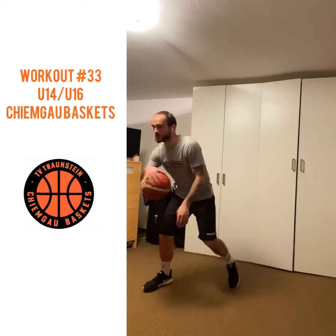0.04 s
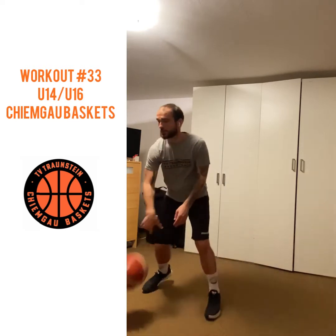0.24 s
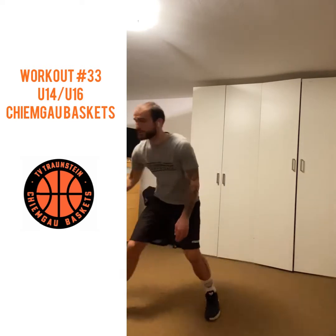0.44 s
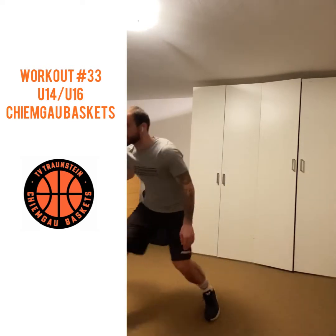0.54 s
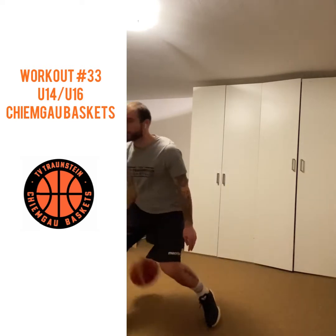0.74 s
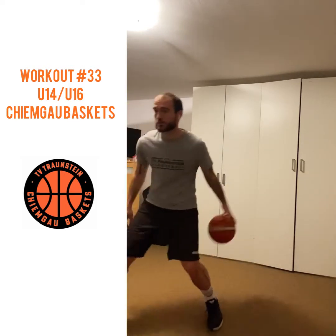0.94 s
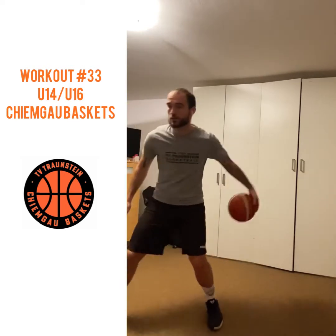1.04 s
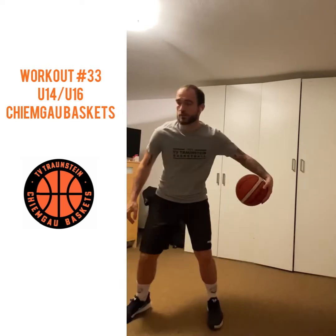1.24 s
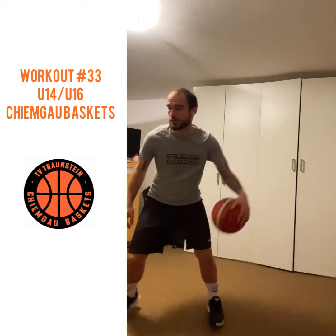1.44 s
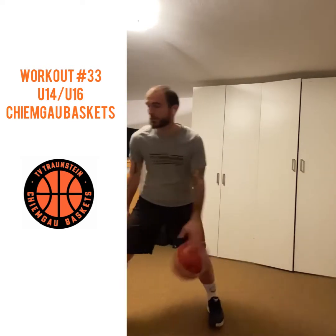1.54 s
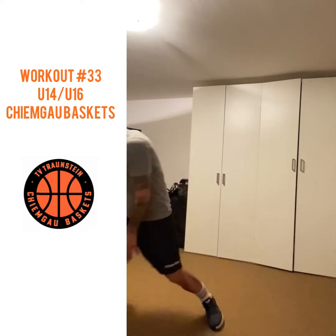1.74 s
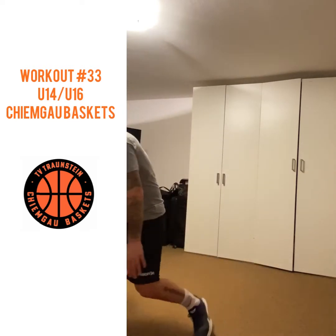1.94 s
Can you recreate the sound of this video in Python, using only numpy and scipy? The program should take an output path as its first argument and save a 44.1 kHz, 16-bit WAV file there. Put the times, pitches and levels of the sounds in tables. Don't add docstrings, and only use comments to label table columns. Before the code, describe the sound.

Three heavy basketball bounces slap and boom in a small room, amid foot thuds and scuffs

```python
import sys
import numpy as np
from scipy import signal
from scipy.fft import rfft, irfft
from scipy.io import wavfile
from scipy.ndimage import uniform_filter1d

SR = 44100
rng = np.random.default_rng(int(sys.argv[2]) if len(sys.argv) > 2 else 0)


def digitize_waveform(pressure):
    field = np.atleast_2d(pressure).T
    bounded = np.clip(field, -1, 1)
    quanta = np.round(bounded * 32767).astype(np.int16)
    wavfile.write(sys.argv[1], SR, quanta)


def volts_from_db(level):
    exponent = np.asarray(level, float) / 20
    return 10 ** exponent


N = 88200
WAVER = 0.8


def evened(x):
    return x / np.sqrt(np.mean(x ** 2) + 1e-20)


def read(points, hz):
    f, value = np.transpose(points)
    return np.interp(np.log(hz + 1), np.log(f + 1), value)


def add(mix, s, sound):
    part = mix[..., round(s * SR):][..., :sound.shape[-1]]
    part += sound[..., :part.shape[-1]]


def colour(points):
    gain = np.log(volts_from_db(read(points, abs(np.fft.fftfreq(4096, 1 / SR)))))
    taps = np.fft.ifft(np.exp(np.conj(signal.hilbert(gain)))).real[:2048]
    return taps / np.linalg.norm(taps)


def pair(size, shape, order=512):
    # frequency in Hz, likeness from 0 to 1.
    likeness = [(60, 0.75), (130, 0.66), (270, 0.98), (570, 0.54), (1220, 0.37), (2590, 0.32), (5500, 0.28),
                (11700, 0.46)]
    hz = np.fft.rfftfreq(order, 1 / SR)[:, None]
    t = np.arange(size * 4 // order + 5) * order / 4 / SR
    a, b, c, d = rng.standard_normal((len(t), len(hz), 4)).T
    same = np.clip(read(likeness, hz), -1, 1)
    left = a + 1j * b
    right = same * left + np.sqrt(1 - same ** 2) * (c + 1j * d)
    spectrum = np.array([left, right]) * shape(hz, t)
    return signal.istft(spectrum, nperseg=order, noverlap=order * 3 // 4)[1][:, :size]


def room(x, wet_db):
    # frequency in Hz, time to fall 60 dB in seconds.
    fading = [(200, 0.44), (500, 0.44), (1000, 0.43), (2000, 0.31), (4000, 0.51), (10000, 0.34)]
    tail = pair(SR // 2, lambda hz, t: volts_from_db(-60 * t / read(fading, hz)))
    tail = tail * np.minimum(np.arange(SR // 2) / SR / 0.0027, 1)
    wet = signal.fftconvolve(x[None], tail / np.linalg.norm(tail[0]), axes=1)
    return volts_from_db(wet_db) * wet + np.pad(x, (0, wet.shape[1] - len(x)))


def ring(hz, db, swell, t60, waver=0):
    t, knots = np.arange(SR * 3 // 4) / SR, np.arange(0, 1, 0.025)
    shape = np.sin(np.pi / 2 * np.minimum(t / swell, 1)) * volts_from_db(db - 60 * np.maximum(t - swell, 0) / t60)
    wander = rng.standard_normal(len(knots)) * np.minimum(knots / 0.032, 1)
    broken = 1 + waver * np.interp(t, knots, wander)
    return shape * broken * np.sin(2 * np.pi * hz * t)


def hush():
    # frequency in Hz, level in dB.
    tone = [(25, -4), (70, -1.5), (130, -21), (200, -21.5), (400, -25), (1200, -28), (4000, -41.5),
            (9000, -50), (11000, -62.5)]
    patch_db = 2.5

    def shape(hz, t):
        patches = rng.standard_normal((len(hz), len(t)))
        patches = uniform_filter1d(patches, size=30, axis=0)
        patches = uniform_filter1d(patches, size=8, axis=1)
        return volts_from_db(read(tone, hz) + patch_db * evened(patches))

    return volts_from_db(-60.5) * evened(pair(N, shape, order=2048))


def click(db):
    # frequency in Hz, level in dB.
    crackle = [(500, -14), (1000, 0), (3000, -3), (4500, -8), (7000, -26), (12000, -50)]
    length = 0.004
    t = np.arange(0, 2 * length, 1 / SR)
    grit = rng.standard_normal((3, len(t))) * np.exp(-2 * t / length)
    return volts_from_db(db + 5.5) * signal.fftconvolve(grit[0] + grit[1:], colour(crackle)[None], axes=1)


def rub(length, db, bright, sharp, wet_db):
    # frequency in Hz, level in dB.
    dull = [(100, -20), (300, 19), (600, 4), (1000, -11.5), (2000, -29), (4000, -37.5), (11000, -70)]
    grain_db = 1.2
    t = np.arange(0, length, 1 / SR)
    strength = np.repeat(rng.exponential(1, len(t)), 60)[:len(t)]
    grains = rng.standard_normal(len(t)) * volts_from_db(grain_db * strength)
    shape = np.minimum(t / 0.0037, 1) * (1 - (t / length) ** 3)
    points = sorted(dull + [(f, read(dull, f)) for f, _ in sharp])
    blend = [(f, (1 - bright) * d + bright * read(sharp, f)) for f, d in points]
    return room(volts_from_db(db) * signal.fftconvolve(evened(grains) * shape, colour(blend)), wet_db)


def knock(hz, db, swell, t60):
    spread = 0.07 * min(1, 2000 / hz)
    cluster = hz * (1 + spread * rng.uniform(-1, 1, 4))
    return room(sum(ring(f, db - 6, swell, min(t60, 0.2), WAVER) for f in cluster), -8)


def boom(second_db, third_db, fourth_db, upper_db):
    # frequency in Hz, level in dB, arrival in seconds,
    # swell in seconds, time to fall 60 dB in seconds.
    low_notes = [(60.1, -10, 0.0196, 0.034, 0.39), (85.15, -14, 0.0087, 0.066, 0.34),
                 (113, -12, 0.008, 0.018, 0.35), (154.4, -9.5, 0.0027, 0.011, .22),
                 (244.4, -14.5, 0.0021, 0.0054, 0.26), (262, -24.5, 0.0017, 0.05, 0.33),
                 (362.5, -24, 0.0013, 0.015, 0.24), (73.5, -36.5, 0.0454, 0.11, 0.39),
                 (139.2, -21.5, 0.004, 0.053, 0.36), (194.2, -26.5, 0.0064, 0.06, 0.4),
                 (284.2, -29.5, .004, 0.024, 0.46), (427.7, -32, 0.00316, .02, 0.32)]
    spot_db, spot_detune = 1.5, 0.03
    out, spot = np.zeros(SR), rng.uniform(-1, 1, (len(low_notes), 2))
    spot[:4] = 0
    more = np.array([0, second_db, third_db, fourth_db] + [upper_db] * (len(low_notes) - 4))
    more = more + spot_db * spot[:, 0]
    for k, (hz, db, wait, swell, t60) in enumerate(low_notes):
        note_hz = hz * (1 + spot_detune * spot[k, 1])
        add(out, max(wait, 0), ring(note_hz, db + more[k], swell, t60, WAVER * (k > 3)))
    return out


def buzz(level_db, wait, hold):
    # frequency in Hz, width in Hz, level in dB.
    high_notes = [(4530, 40, -7.5), (4820, 33, -5), (4950, 30, 1), (5096, 44, -3.5), (5230, 26, 2),
                  (5270, 30, -7), (5500, 30, -9.5), (5930, 37, -7), (4980, 340, 4.5), (5250, 700, 1.5),
                  (9520, 830, -4.5), (12650, 250, -28)]
    rise_s, t60_s, ticks_per_s, alike = 0.027, 0.28, 1800, -0.11
    t = np.arange(SR // 2) / SR
    hits = rng.random(len(t)) < ticks_per_s / SR
    ticks = rng.standard_normal((2, len(t))) * (0.096 + 3 * hits)
    ticks = ticks + alike * ticks[::-1]
    out = 0
    for hz, width, db in high_notes:
        turn, r = np.exp(2j * np.pi * hz * t), np.exp(-np.pi * width / SR)
        note = turn * signal.lfilter([1], np.convolve([1, -r], [1, -r]), ticks / turn)
        out = out + volts_from_db(db) * evened(note.real)
    steady = out / np.sqrt(uniform_filter1d((out ** 2).mean(0), size=1500))
    late = np.maximum(t - wait - rise_s - hold, 0)
    return steady * np.clip((t - wait) / rise_s, 0, 1) * volts_from_db(level_db - 60 * late / t60_s)


def bounce(slap_db, echo_db, echo_s, hard, spot, rattle):
    # frequency in Hz, level in dB.
    ball_notes = [(870, -29.5), (925, -22), (1010, -21), (1085, -20), (1150, -32.5), (1270, -32),
                  (1380, -30), (1500, -22.5), (1600, -22.5)]
    # frequency in Hz, level in dB.
    slap = [(120, -51.5), (300, 9.5), (600, -6), (1200, -2.5), (2000, -17), (3000, -31), (6000, -39),
            (11000, -58)]
    # frequency in Hz, level in dB.
    tick_colour = [(300, -24.5), (700, 2.5), (1200, 8.5), (1700, 2.5), (2500, -26.5), (5000, -37.5),
                   (11000, -43)]
    tilt_db = 52.5 * (hard - 1)
    ball = 0
    for hz, db in ball_notes:
        note_db = db - 30.5 + tilt_db * np.log2(hz / 1150)
        ball = ball + ring(hz * rng.uniform(0.98, 1.02), note_db, 0.00035, 0.2, WAVER)
    skin = ball.copy()
    add(skin, 0, colour([(f * hard, db) for f, db in slap]))
    tick = volts_from_db(slap_db + 7.5) * colour([(f * hard, db) for f, db in tick_colour])
    out = np.zeros((2, SR)) + boom(*spot)
    add(out, 0, room(volts_from_db(slap_db - 2.0) * skin, 18.5))
    add(out, 0, volts_from_db(slap_db + 14.5) * ball[None])
    add(out, 0.0003, tick[None])
    add(out, echo_s, volts_from_db(echo_db) * tick[None])
    add(out, 0, buzz(*rattle))
    return out


def scene():
    mix = hush()

    # start in seconds, level in dB.
    clicks = [(.153, -50), (0.4168, -49), (0.4251, -47), (.574, -63), (1.5967, -40), (1.0435, -54.5),
              (1.2775, -64.5), (1.2869, -63), (1.37, -61.5), (1.56, -61), (1.381, -61)]
    for s, db in clicks:
        add(mix, s, click(db))

    # start in seconds, length in seconds, level in dB,
    # brightness from 0 to 1.
    rubs = [(0.092, 0.069, -76, 0.2), (0.127, 0.099, -51.5, 0.65), (0.147, 0.031, -46, 0.59),
            (0.376, 0.025, -56.5, 1.0), (.413, 0.034, -43, 0.58), (0.423, 0.029, -40.5, 0.65),
            (0.447, 0.032, -38.5, 0.3), (0.711, 0.042, -49.5, 0.5), (0.735, 0.011, -44.5, 0.91),
            (0.879, 0.051, -56.5, 0.97), (0.949, 0.032, -55, 0.7), (0.997, 0.044, -63, 0.95),
            (1.042, 0.12, -53, 0.6), (1.278, 0.0026, -58.5, 0.6), (1.292, 0.14, -77, .9),
            (1.369, 0.0072, -64.5, 0.66), (1.39, 0.046, -68, 0.7), (1.485, 0.049, -77.5, 1),
            (1.556, 0.16, -52, 0.69), (1.586, 0.0037, -34.5, 0.7), (1.746, 0.06, -56, 0.89),
            (1.827, 0.037, -59.5, 0.74), (1.966, 0.042, -69.5, 0.8)]
    # frequency in Hz, level in dB.
    bright_colour = [(100, -35.5), (300, -9), (1000, -6.5), (2000, -6), (4000, -19.5), (7000, -13),
                     (11000, -19)]
    for s, *row in rubs:
        add(mix, s, rub(*row, bright_colour, 0))

    # start in seconds, length in seconds, level in dB.
    scuffs = [(0.141, 0.025, -59), (0.42, .04, -51.5), (0.72, 0.018, -53.5), (1.011, 0.0142, -62),
              (1.044, .15, -53), (1.274, 0.08, -68), (1.368, 0.038, -65), (1.437, 0.019, -71.5),
              (1.495, 0.025, -79), (1.756, 0.043, -56.5), (1.833, .03, -63)]
    # frequency in Hz, level in dB.
    scuff_colour = [(300, -31), (700, -9.5), (1000, 6.5), (1500, -4.5), (2600, -8.5), (4000, -14),
                    (5500, -20.5), (10000, -32)]
    for s, *row in scuffs:
        add(mix, s, rub(*row, 0.89, scuff_colour, -3.5))

    # start in seconds, frequency in Hz, level in dB,
    # swell in seconds, time to fall 60 dB in seconds.
    knocks = [(0.575, 3500, -63.5, .0003, 0.004), (0.49, 670, -43, 0.0009, 0.081),
              (1.6, 630, -47, 0.0047, 0.03), (.45, 545, -35, .006, 0.12), (0.4, 400, -38, 0.0023, 0.059),
              (1.044, 880, -51, 0.004, 0.15), (1.084, 1010, -52, 0.008, 0.2),
              (0.98, 650, -56.5, 0.015, 0.12), (0.8, 210, -35.5, 0.013, 0.24),
              (1.075, 680, -60, 0.01, 0.16), (1.8, 310, -53, 0.0092, 0.44),
              (1.76, 2050, -49.5, 0.0019, 0.063), (1.832, 4600, -64.5, 0.006, 0.06),
              (1.917, 2600, -79, 0.015, 0.14), (1.973, 1450, -57, 0.00071, 0.0067),
              (1.9836, 1500, -76, 0.0011, 0.033), (1.1, 1500, -66, 0.0006, 0.02)]
    for s, *row in knocks:
        add(mix, s, knock(*row))

    # start in
    # seconds, frequency in Hz, # level in dB, swell in seconds, time to fall 60 dB in seconds.
    pings = [(.256, 915, -26, 0.014, 0.17), (.262, 1150, -31.5, .01, 0.12),
             (.2456, 1650, -36.5, .003, 0.13), (.735, 710, -36, .004, 0.11),
             (.735, 1200, -34.5, .003, 0.075), (1.6, 700, -30, 0.01, .15), (1.6, 1010, -34, .004, 0.14),
             (1.6, 1390, -34, .004, .15), (1.15, 1010, -57, .006, .12), (1.049, 400, -47, .006, .08),
             (.93, 410, -48, .01, .15), (1.78, 180, -41.5, 0.023, 0.25), (.45, 680, -38.5, 0.0025, 0.054),
             (0.5, 350, -36, .003, 0.094), (.74, 1700, -32, 0.0025, .1), (1.602, 1550, -31.5, .003, 0.09),
             (1.85, 250, -49, 0.011, 0.13)]
    for s, *row in pings:
        add(mix, s, ring(*row, WAVER / 2)[None])

    # start in seconds, level under a bounce in dB,
    # level of the upper low notes in dB.
    thuds = [(0.119, -30, -19), (0.145, -13, -14), (0.45, -17, -10), (0.628, -34.5, -10), (1, -32, -8),
             (1.112, -34.5, -6), (1.303, -57.5, -18), (1.441, -59.5, -3), (1.556, -33.5, -3.5),
             (1.898, -34.5, -10.5)]
    for s, db, upper_db in thuds:
        add(mix, s, volts_from_db(db) * boom(-1.3, upper_db, upper_db, upper_db)[None])

    # start in seconds, slap level in dB, wall echo level in dB, wall echo delay in
    # seconds, hardness as a factor on the pitch of the slap.
    bounces = [
        (0.2451, -7, -9, 0.0072, 1.117),
        (0.7337, -7.5, 1.5, 0.0061, 1.007),
        (1.598, -11, -14.5, 0.0069, 1.13),
    ]
    # second, third, fourth and upper notes, all in dB.
    spots = [(-0.5, -0.5, 1, -1), (-8, -5, -1.5, -2), (-0.5, -4.5, 0, -3.5)]
    # level in dB, wait in seconds, hold in seconds.
    rattles = [(-48.5, 0.023, 0.099), (-47.5, 0.038, .05), (-50, 0.022, 0.077)]
    for (s, *row), spot, rattle in zip(bounces, spots, rattles):
        add(mix, s, bounce(*row, spot, rattle))
    return mix


def band_limit(x):
    return signal.sosfilt(signal.butter(12, 15800, fs=SR, output="sos"), x)


def record(dry):
    # frequency in Hz, left over right in dB.
    lean = [(60, 1), (110, 1.5), (190, 0.5), (350, 1.5), (620, 4), (1120, 2), (2010, -0.5), (3620, -2.5),
            (6500, -2.5), (11700, 3.5)]
    # frequency in Hz, level in dB.
    side_lift = [(2000, 2.5), (6000, 2), (10000, 5), (13000, 13), (15500, 16)]
    side_edge_hz, mid_edge_hz = 15800, 11700
    hz = np.fft.rfftfreq(N, 1 / SR)
    left, right = rfft(dry) * volts_from_db(np.outer([0.5, -0.5], read(lean, hz)))
    mid = (left + right) / 2 / (1 + (hz / mid_edge_hz) ** 60)
    side = (left - right) / 2 * (hz < side_edge_hz) * volts_from_db(read(side_lift, hz))
    return band_limit(irfft([mid + side, mid - side], N))


dry = scene()
out = record(dry)
digitize_waveform(out)
```